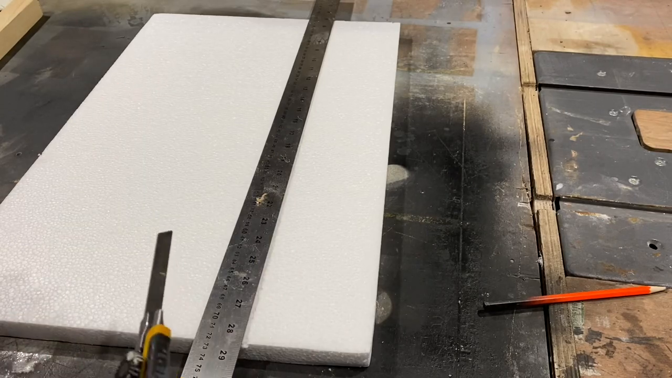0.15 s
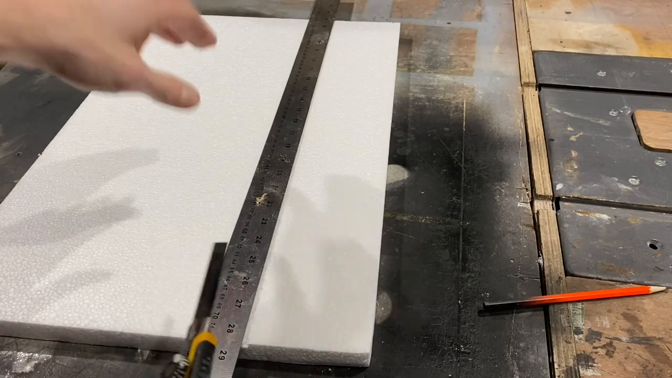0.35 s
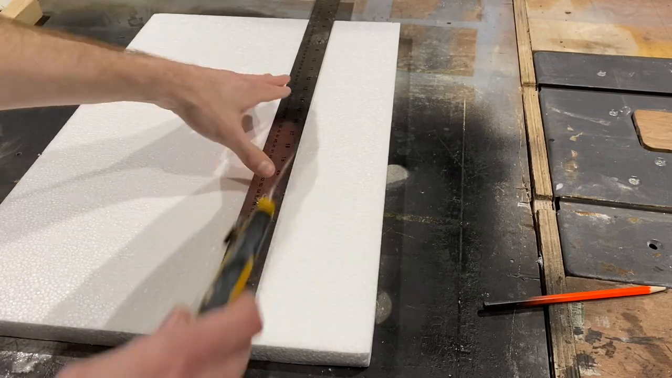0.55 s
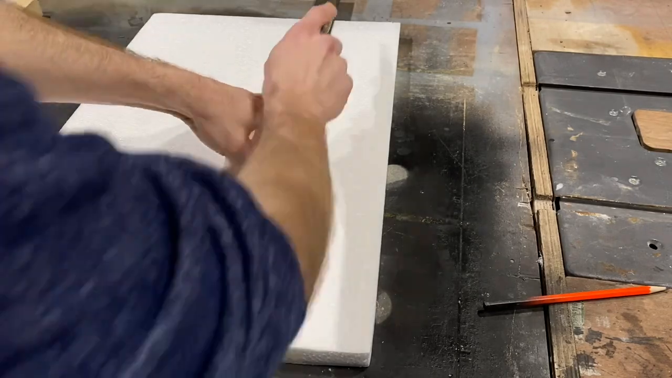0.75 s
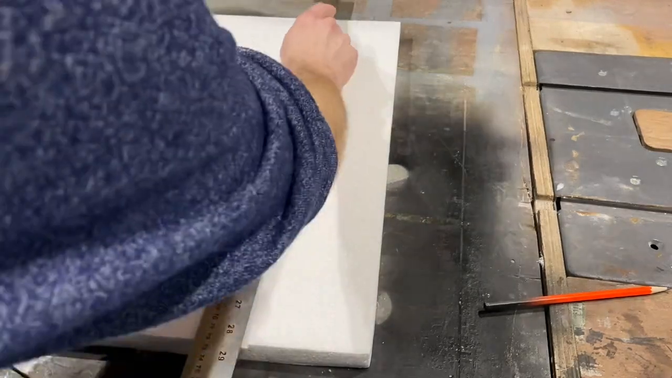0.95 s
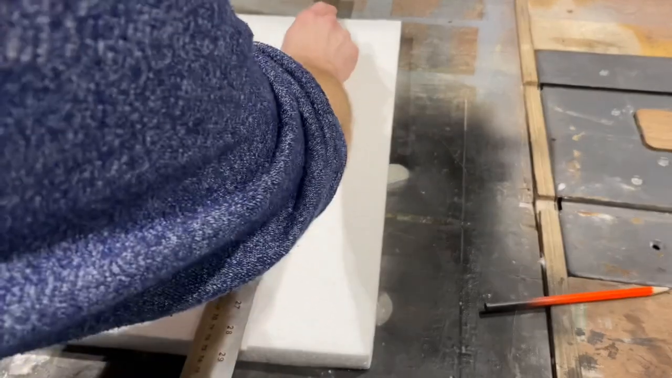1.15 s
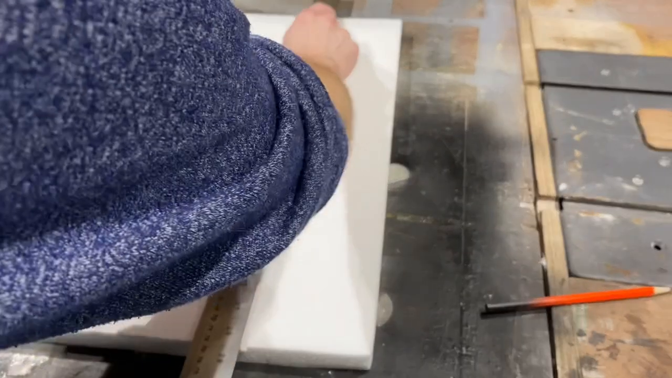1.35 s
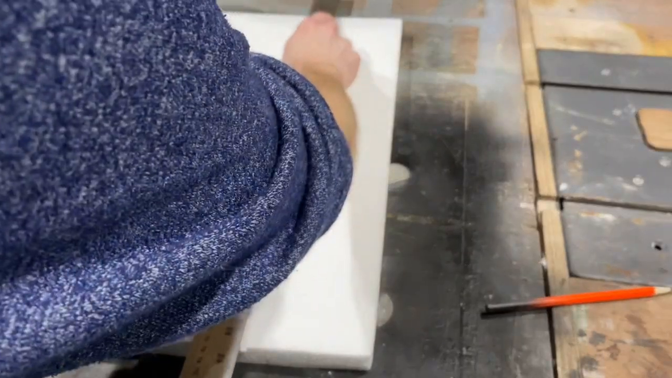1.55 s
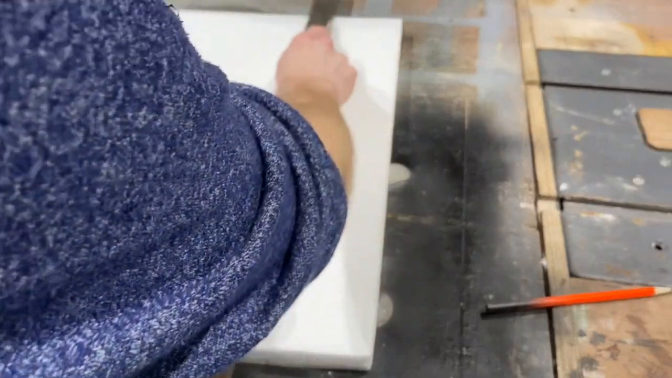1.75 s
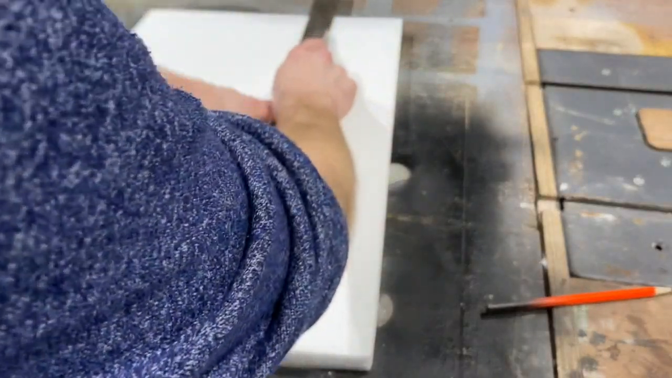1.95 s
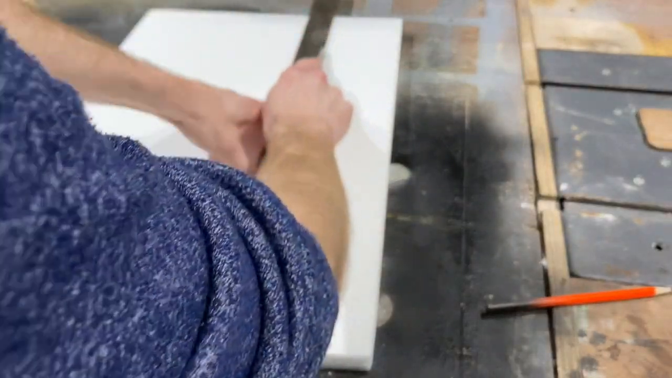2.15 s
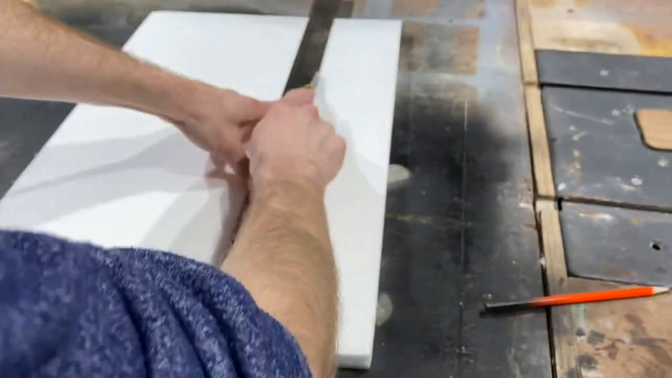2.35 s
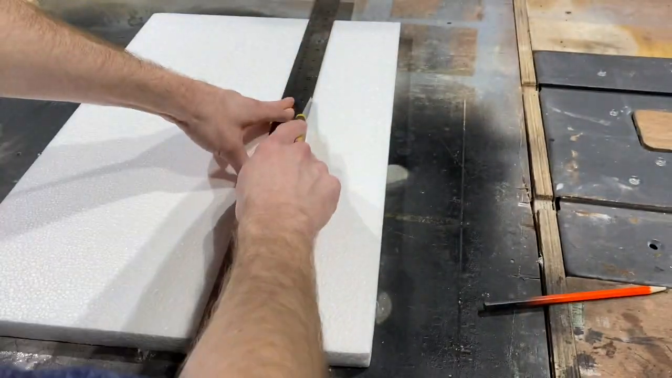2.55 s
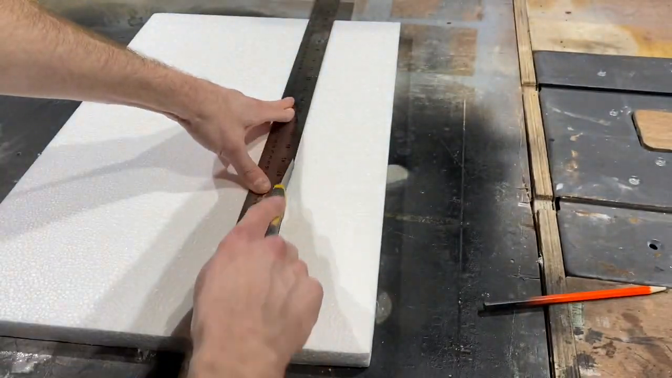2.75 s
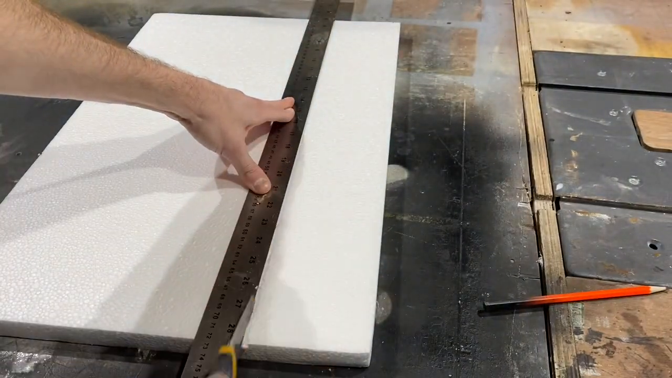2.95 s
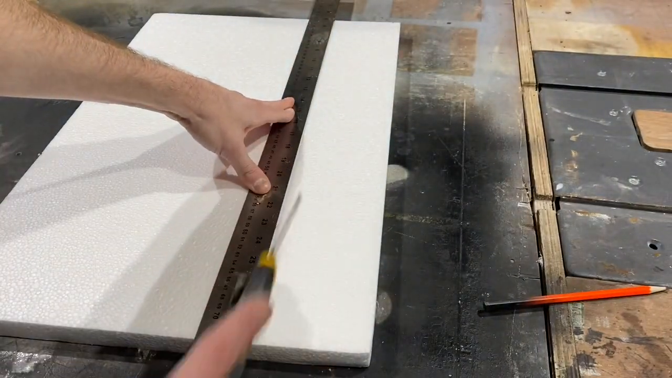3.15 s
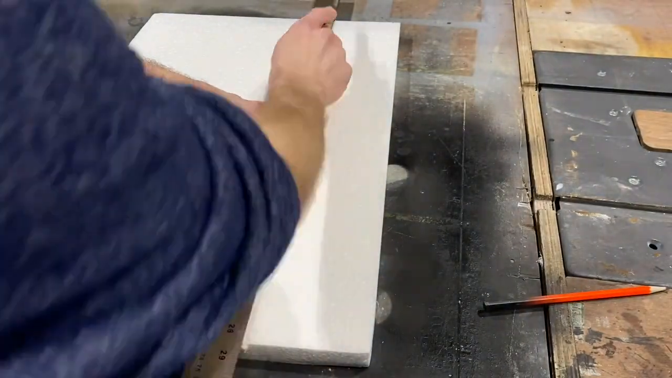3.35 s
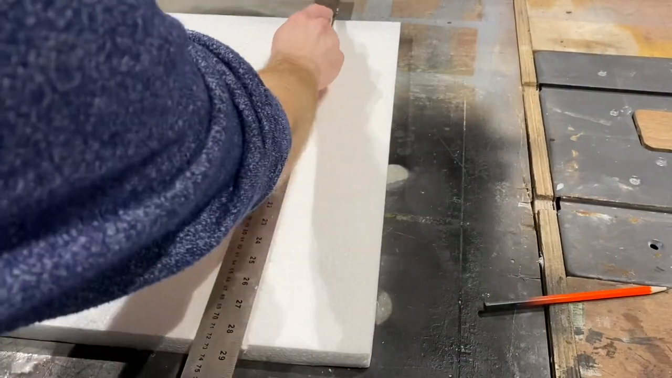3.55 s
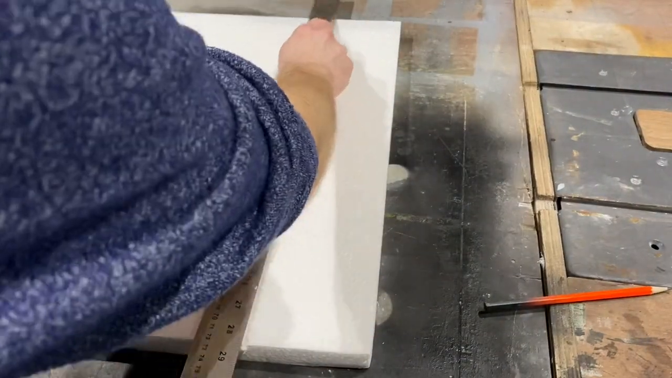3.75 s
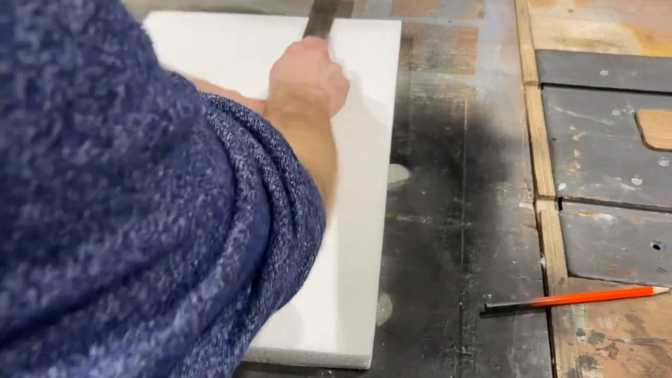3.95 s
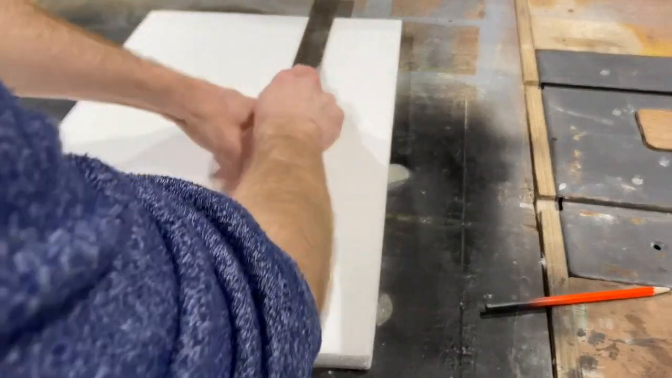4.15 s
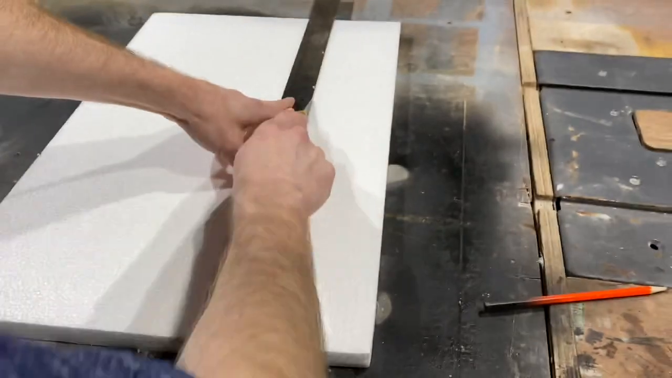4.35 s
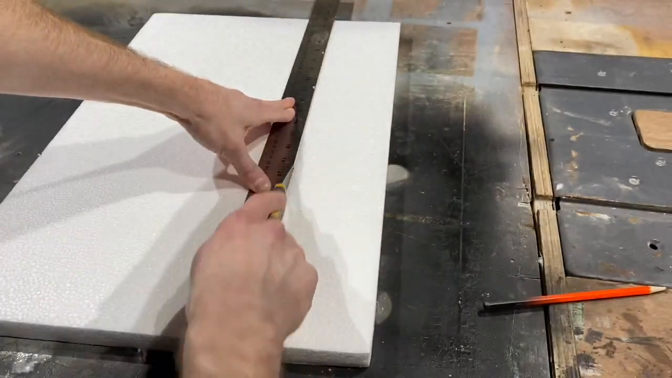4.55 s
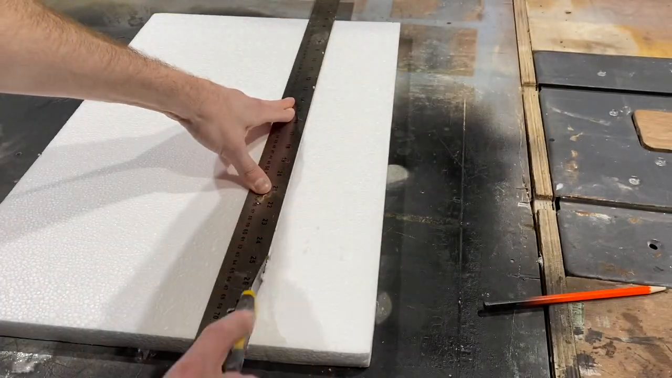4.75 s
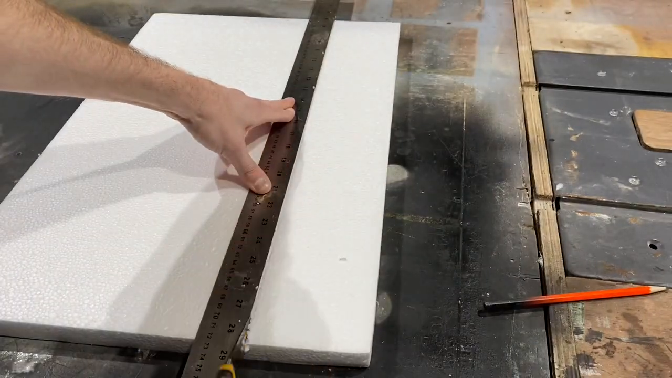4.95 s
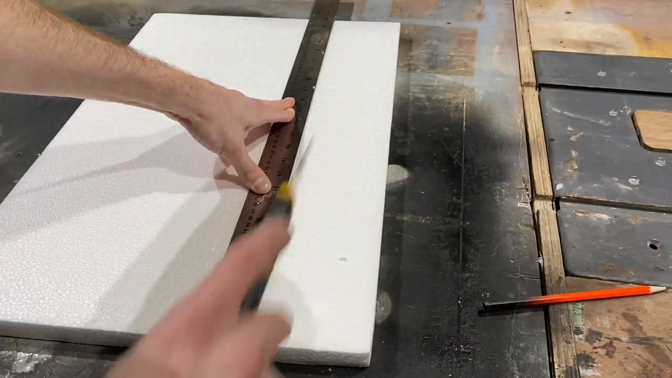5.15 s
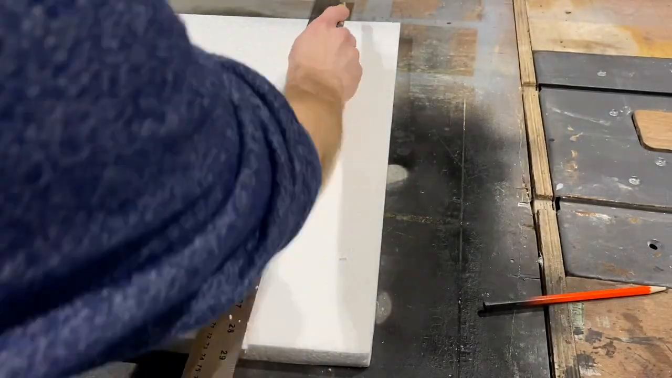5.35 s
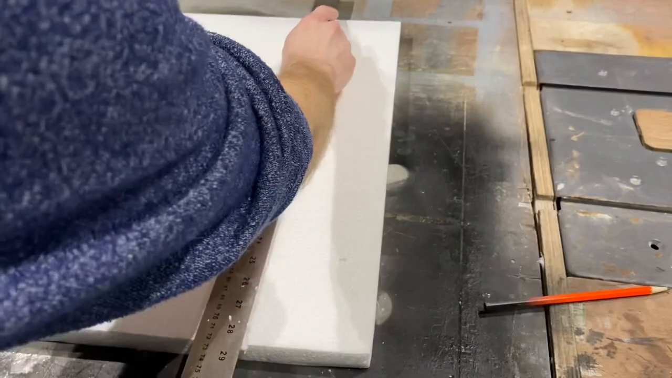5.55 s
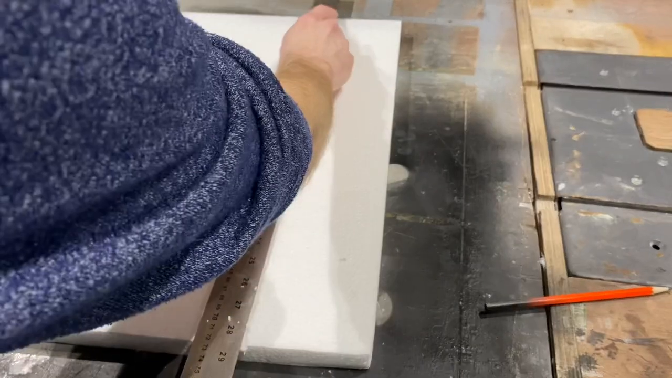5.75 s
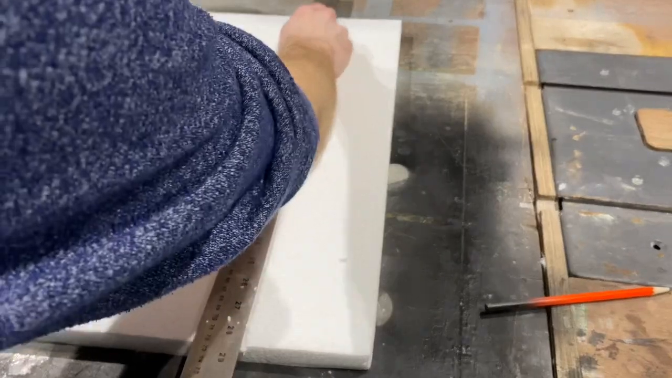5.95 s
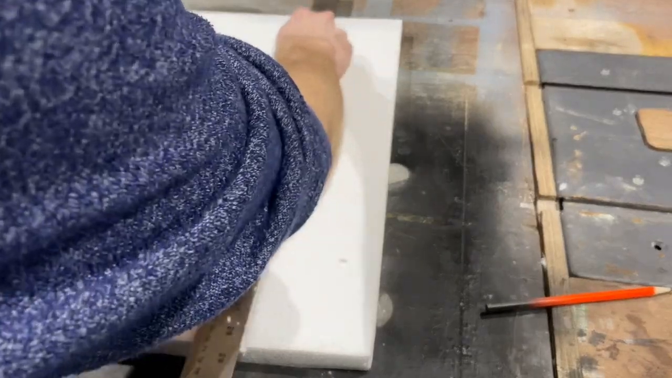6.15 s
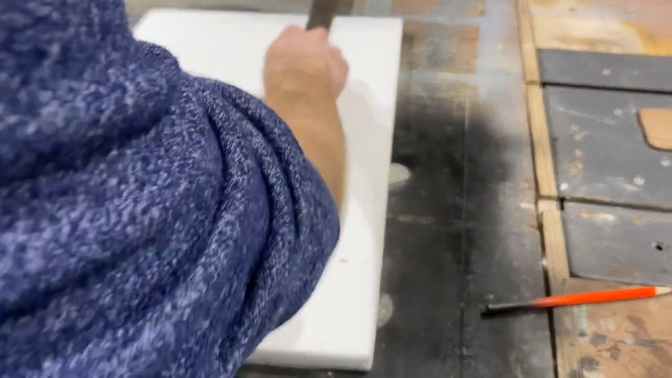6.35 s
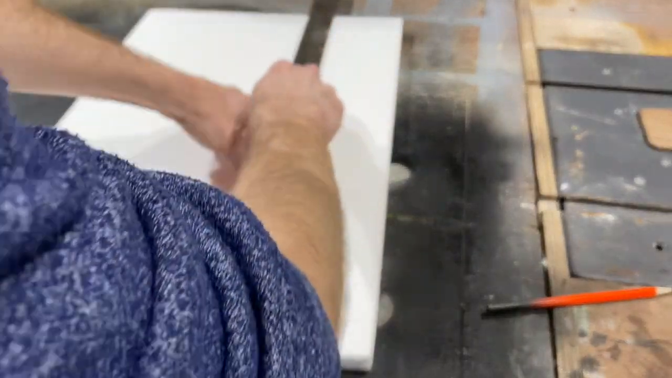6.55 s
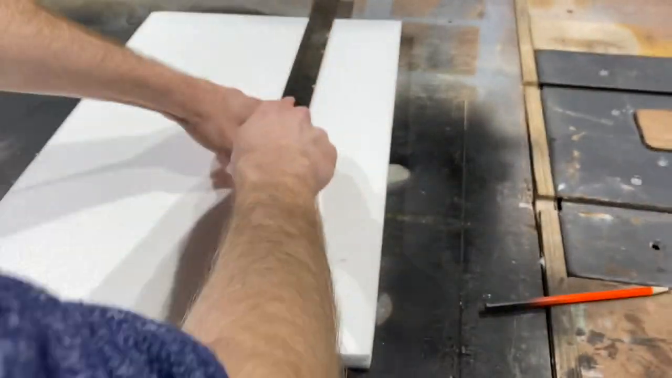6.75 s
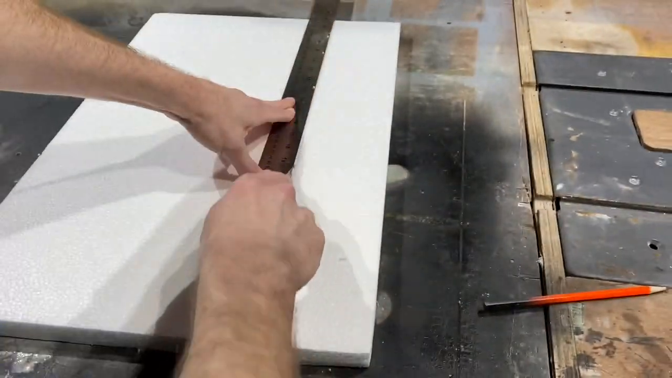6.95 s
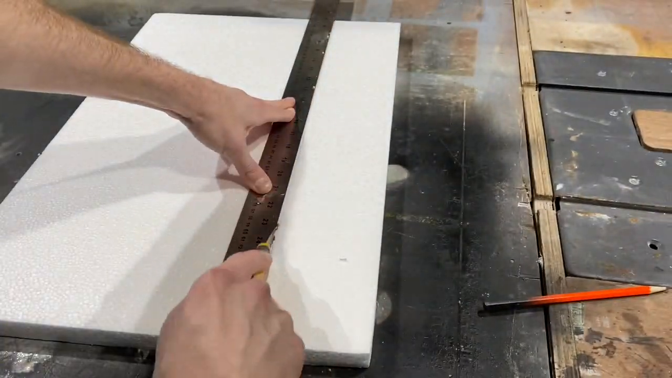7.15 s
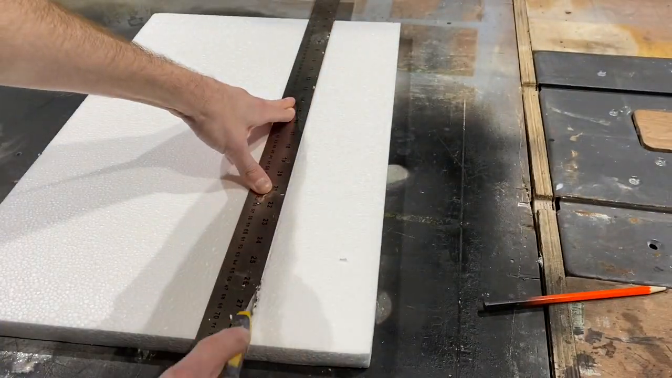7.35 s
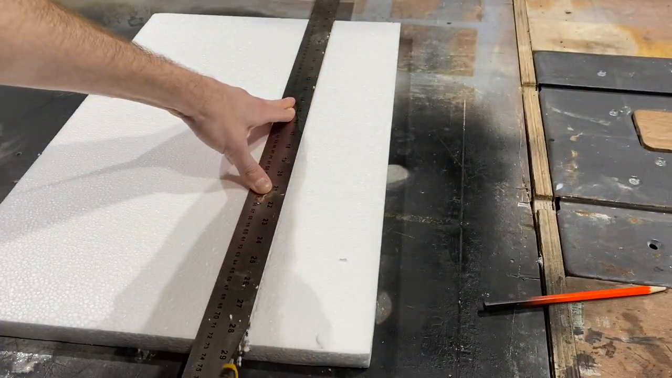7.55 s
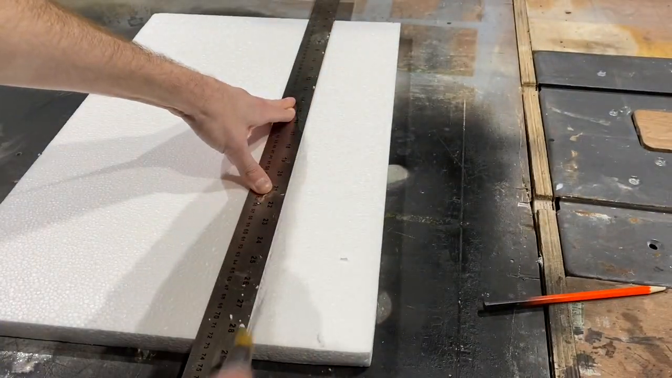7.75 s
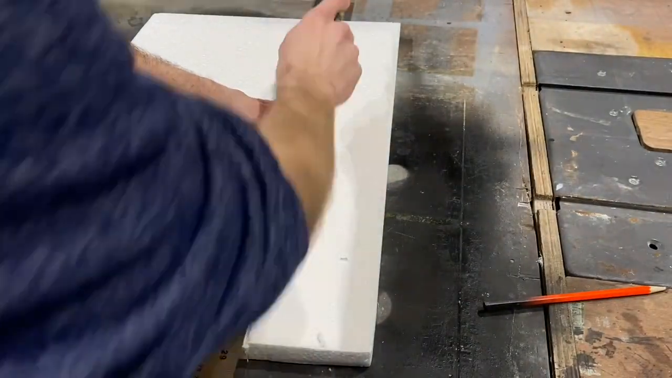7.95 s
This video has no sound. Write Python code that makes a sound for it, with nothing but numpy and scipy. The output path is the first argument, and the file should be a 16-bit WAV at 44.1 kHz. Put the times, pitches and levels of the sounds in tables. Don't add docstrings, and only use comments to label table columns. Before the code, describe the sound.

In a quiet workshop, a wooden knock sounds across the room and a ruler pings faintly. A blade then tears through polystyrene foam three times, each stroke a dense crackling fizz of about a second and a half. Sharp bead snaps and short squeaks sit on top; between strokes come taps, rubs and ticks on the steel ruler. The pressed bench groans softly. Close stereo microphone.

```python
import sys
import numpy as np
from scipy import signal
from scipy.fft import rfft, irfft, next_fast_len
from scipy.io import wavfile
from scipy.ndimage import uniform_filter1d

SR = 44100
rng = np.random.default_rng(int(sys.argv[2]) if len(sys.argv) > 2 else 0)


def gain_from_db(level_db):
    decades = np.asarray(level_db, float) / 20
    return 10 ** decades


def log_audio(samples):
    frames = np.atleast_2d(samples).T
    limited = np.clip(frames, -1, 1)
    pcm = np.round(limited * 32767).astype(np.int16)
    wavfile.write(sys.argv[1], SR, pcm)


N = 352976

# time in seconds, level in dB.
HUM = [(0.0, -60), (0.2, -65.5), (0.6, -57.5), (0.91, -63), (1.54, -58.5), (1.91, -68.5), (2.58, -60.5),
       (2.82, -68.5), (3.05, -75.5), (3.3, -65.5), (3.45, -70.5), (4.9, -70), (5.28, -59), (5.72, -60.5),
       (6.55, -55.5), (8.0, -59)]
# frequency in Hz, gain in dB.
HUM_COLOUR = [(35, -48.5), (60, 3.5), (150, -6), (297, -9.5), (432, -4.5), (815, -13), (1060, -18.5),
              (1430, -21.5), (16500, -75)]
# frequency in Hz, width in Hz, level in dB.
ROOM_MODES = [(135.6, 60, 10), (202, 5.8, 13), (267.3, 56, 9)]
# peak in seconds, level in dB, seconds to rise and seconds to fall 20 dB.
HANDLING = [(.39, -61, 4, 0.026), (8.0, -83, 1.5, 0.87)]
# start in seconds, peak in dB.
KNOCKS = [(0.152, -37), (0.1606, -30.5), (0.186, -47)]
# frequency in Hz, gain in dB.
KNOCK_COLOUR = [(120, -35), (300, -22), (453, -11), (815, -8.5), (1200, -14), (1530, -7.5), (2200, -23),
                (2950, -24.5), (4180, -36), (8000, -54), (10400, -45.5), (17600, -120)]
# peak in seconds, level in dB, seconds to rise and seconds to fall 20 dB.
RUSTLE = [(.04, -77.5, 0.34, 0.084), (.52, -72, 0.04, 0.8), (.68, -69.5, 0.22, 0.23),
          (1.37, -83, 0.41, 0.046), (3.3, -69, 0.13, 0.089), (5.16, -77, 0.13, 0.45),
          (5.85, -76.5, 0.14, 0.028), (7.95, -87, 0.4, 0.55)]
# frequency in Hz, gain in dB.
RUSTLE_COLOUR = [(1470, -53), (2500, -27.5), (4700, -5.5), (6500, -11.5), (8770, -8.5), (15500, -17.5),
                 (16500, -35)]
# peak in seconds, level in dB, seconds to rise and seconds to fall 20 dB.
BENCH = [(2.05, -67.5, 0.14, 9.5), (2.63, -56.5, 0.058, 0.21), (3.256, -67.5, 0.057, 0.057),
         (4.15, -62, 0.19, 0.26), (5.05, -65, 0.093, 0.32), (6.11, -53, 0.032, 0.047), (6.2, -65, .1, 1.6),
         (6.95, -51, 0.97, 0.63), (7.68, -52.5, 0.12, 0.042)]
# frequency in Hz, width in Hz, level in dB.
BENCH_PEAKS = [(205, 8.3, -2), (313.3, 11, 4.5), (432, 9.7, 4.5), (578, 72, 0), (780, 100, -3.5),
               (912, 19, -1)]
# start in seconds, end in seconds, frequency in Hz, level in dB.
GROANS = [(6.08, 6.47, 840, -53), (6.3, 6.672, 204, -56), (6.3, 6.67, 302, -59.5),
          (6.517, 7.187, 603, -57.5), (6.704, 6.88, 586, -50.5), (6.778, 6.893, 200, -57.5),
          (6.822, 7.18, 928, -48.5), (7.1, 7.17, 650, -51.5), (6.08, 6.125, 1500, -54),
          (7.098, 7.725, 445, -60.5), (7.577, 7.717, 760, -57), (6.6, 7.17, 780, -52),
          (6.7, 7.045, 630, -58), (3.6, 3.71, 140, -66), (3.76, 3.85, 203, -61), (5.6, 6.045, 195, -63),
          (4.0, 4.306, 438, -66.5), (5.6, 4.6, 4720, -77)]
# start in seconds, peak in dB, frequency in Hz.
THUMPS = [(0.599, -43, 202), (3.187, -46.5, 112.3), (3.801, -44.5, 149), (5.199, -40.5, 130),
          (5.552, -40.5, 212), (5.59, -48, 205)]
# frequency in Hz, level in dB, 60 dB decay in seconds.
RULER = [(1098, -8, .15), (2067, -9.5, .4), (3359, -12, .13), (5071, -6, .33), (6691, -24, .2),
         (10140, -18, .2)]
# start in seconds, peak in dB.
TAPS = [(1.044, -57), (1.089, -47), (1.104, -49), (1.174, -50), (3.463, -48.5), (3.497, -53), (5.536, -39),
        (5.857, -38.5), (6.088, -33), (7.685, -39)]
# start in seconds, level in dB, tilt in dB per octave, hold in ms.
RUBS = [(.887, -56, -0.5, 49), (1.007, -64.5, -2.5, 7.6), (1.041, -53, -5, 24), (1.297, -61, -3, 41),
        (1.347, -52.5, -4.5, 47), (1.37, -36.5, 4, 9.5), (2.216, -43, 9, 8.4), (2.287, -35, 6, 5.9),
        (3.565, -54, -3, 18), (3.906, -37, -1, 15), (5.338, -51.5, -0.5, 62), (5.787, -65.5, -1, 4.7),
        (5.856, -38, -0.5, 7.8), (7.672, -46, -6, 6.3), (7.725, -65.5, 2, 3)]
# start in seconds, level in dB, tilt in dB per octave, fade in ms.
CLACKS = [(1.09, -58, -3.5, 210), (1.132, -65, -1, 410), (1.167, -50.5, 1, 68), (2.995, -35, -1, 46),
          (3.0035, -53.5, -1.5, 230), (3.461, -53, -1.5, 196), (3.488, -63, -8, 94), (5.509, -58, -0.5, 79),
          (5.537, -48.5, 2, 150), (5.606, -55.5, 0.5, 99), (5.727, -56, 3, 130), (5.832, -54.5, -2.5, 350),
          (5.919, -54, 0, 78)]
SLIDES = [1.167, 1.347, 3.566, 3.906, 5.338, 5.606, 5.833, 7.674]
# frequency in Hz, level in dB, 60 dB decay in seconds.
BLADE = [(1266, -2.5, 0.35), (2173, -9, 0.25), (3540, -11.5, 0.27), (4880, 6, 0.35), (6710, 9.5, 0.33),
         (8800, 10.5, 0.052), (11450, -5, 0.3), (12800, -22, 0.19), (14500, -26.5, 0.17)]
# start in
# seconds, peak in dB.
CHATTER = [(2.9907, -12), (2.9951, -19), (2.997, -19), (2.9985, -16), (3.0024, -20.5), (5.51, -49),
           (5.7271, -40.5)]
# frequency in Hz, level in dB, 60 dB decay in seconds.
CHATTER_MODES = [(4800, -4, .012), (7800, -3, .006), (8500, 0, .014), (11000, -4, .009), (12600, -4, .008),
                 (15000, -5, .007)]
# start in seconds, peak in dB, frequency in Hz, 60 dB decay in seconds.
TINKS = [(1.046, -45, 1480, 0.049), (1.091, -43, 1380, 0.049), (1.103, -53, 3350, .08),
         (1.106, -53, 800, .08), (1.078, -57, 2150, .2), (1.142, -60, 5000, .06), (1.112, -48, 1340, .04),
         (1.052, -49, 2700, .04), (1.14, -54, 3350, .05), (1.142, -61, 6600, 0.25),
         (1.143, -63, 10850, .15), (1.169, -61, 10850, 0.091), (3.008, -53, 1155, 0.15),
         (1.369, -39, 1160, 0.066), (1.369, -33.5, 2920, 0.028), (5.538, -44, 700, 0.07),
         (5.54, -46, 332, 0.069), (3.462, -45.5, 6730, 0.13), (3.464, -50, 8650, 0.033),
         (3.464, -55.5, 4900, 0.064), (3.465, -62, 10850, 0.16), (5.537, -54, 10850, 0.14),
         (5.54, -52, 2100, 0.1), (5.602, -55, 3946, 0.089), (5.729, -58.5, 5020, .08),
         (5.79, -59, 3660, .06), (5.858, -48, 856, .06), (5.858, -41, 1200, 0.066),
         (7.682, -35.5, 1400, 0.047), (7.682, -42, 790, .06), (7.677, -43, 9700, 0.043)]
# start in seconds, level
# in dB, length in ms, start in Hz, end in Hz.
SQUEAKS = [(2.995, -44, 13, 1170, 1184), (3.712, -47, 9.8, 1220, 1190), (3.745, -49.5, 18, 800, 794),
           (3.752, -45, 4, 15000, 15200), (3.776, -35, 13, 9900, 7900), (3.787, -33.5, 13.2, 8000, 10000),
           (3.818, -42.5, 14, 14900, 14400), (3.858, -34, 18, 15100, 14200), (3.876, -40, 24, 11600, 13300),
           (3.904, -44, 8, 11300, 11400), (6.089, -45.5, 30, 1160, 1195), (6.092, -53, 33, 830, 830)]
# start in seconds, peak in dB, tilt in dB per octave.
SNAPS = [(0.3888, -62, -14), (1.0527, -31.5, 1), (1.0906, -43, -2), (1.1295, -42, -2), (1.2172, -57, -0.5),
         (1.26, -54, 2), (1.3025, -50, -2), (1.3684, -14.5, -4.5), (1.528, -31, -1), (1.5699, -21.5, -2),
         (1.6497, -27, -4), (1.768, -26, -4), (1.8149, -24.5, -4), (1.842, -38.5, 0), (1.871, -39, 5),
         (1.9092, -18.5, -5), (1.9402, -33.5, 7), (1.965, -32, -6), (1.9847, -30, 5), (1.996, -29, -4),
         (2.006, -37, -2), (2.3477, -38, 1), (2.883, -27, 6), (2.898, -24, 8), (2.9088, -22, 9),
         (2.925, -27, 10), (2.9906, -27, 8), (2.9975, -27, 3), (3.324, -52, -12), (3.543, -64, 12),
         (3.5804, -32.5, 1), (3.63, -45, 1.5), (3.6433, -37.5, -2), (3.6538, -31, 1), (3.6597, -27, -2),
         (3.665, -29, -1), (3.917, -26, 2), (4.439, -27, 20.5), (4.4713, -30, 2), (4.6412, -26, 12),
         (4.777, -25.5, 11), (5.534, -32.5, 7), (5.8572, -26.5, -3.5), (5.9174, -45, 0), (6.111, -32, 0),
         (6.118, -30, -2), (6.5121, -31, 12), (6.9496, -24.5, 10), (7.2504, -23.5, 5.5)]
# frequency in Hz, gain in dB.
SNAP_COLOUR = [(350, -71), (600, -31), (1300, -15), (2240, -19), (4610, 1.5), (5440, -7.5), (8250, -9),
               (10600, -16), (13800, -12.5), (16500, -36.5)]
# time in seconds, drag in dB, slot resonance in Hz, uncovered fizz in dB.
STROKES = [
    [(1.4, -51, 4670, -12.5), (1.6, -45, 4400, -15), (2.097, -43.5, 5230, -10), (2.237, -44.5, 5320, -1),
     (2.43, -51.5, 5640, -1), (2.52, -51.5, 7030, 1), (2.76, -48.5, 6600, 0), (2.855, -42.5, 5750, 0.5),
     (2.988, -45, 4580, 1.5)],
    [(3.59, -60.5, 4870, -7), (3.68, -45.5, 4560, -3), (3.9, -38, 4360, -7), (4.076, -40.5, 5330, -10),
     (4.24, -47.5, 5400, 4.5), (4.33, -50, 6930, 1.5), (4.55, -48, 6500, 1.5), (4.724, -44, 5380, -0.5),
     (5.03, -53, 5070, -3.5)],
    [(5.89, -59, 5620, -3), (5.973, -48.5, 4840, -3), (6.159, -43, 4480, -11), (6.319, -40, 5270, -13),
     (6.529, -46.5, 5540, -1.5), (7.2, -45, 5380, -2), (7.469, -53, 5250, -0.5), (7.609, -47.5, 5100, -7),
     (7.67, -56.5, 5590, -4)],
]
GRIT = [0.8, 0.45, 0.45]
# level at start and at end in dB re drag, resonance in Hz on the far part
# and on the near part, hand-over between them in seconds.
BOARDS = [(-11, -10.5, 1327, 1980, 2.68), (-12.5, -16, 1395, 1920, 4.4), (-10, -3, 850, 930, 12)]
# frequency in Hz, gain in dB.
TEAR_COLOUR = [(700, -67.5), (2200, -11.5), (3000, -3.5), (4000, -1.5), (6000, -1), (8000, -5), (11000, -6),
               (16500, -31)]
# frequency in Hz, gain in dB.
FIZZ_COLOUR = [(5000, -20.5), (7000, 0), (8500, -1.5), (10500, -1.5), (12500, 1.5), (15000, 5.5),
               (16500, -14)]
# frequency in Hz, gain in dB.
BOARD_COLOUR = [(350, -35.5), (700, -10.5), (1200, -2), (1800, 0.5), (2400, -4.5), (3200, -14)]
# frequency in Hz, half width in Hz, level in dB.
EDGE = [(3050, 250, 0), (3850, 250, 0)]
# start in seconds,
# end in seconds, start in Hz, end in Hz, gain in dB.
ARCS = [(1.5, 1.8, 6500, 6300, 3), (1.543, 2.14, 3220, 3250, 5), (2.15, 2.45, 3220, 2930, -27),
        (2.24, 2.5, 5500, 5800, -9), (2.302, 2.7, 3960, 3450, 2.5), (2.65, 2.99, 1950, 2000, 3),
        (2.602, 2.98, 3970, 3920, 2), (2.75, 2.98, 3100, 3200, 5.5), (2.298, 2.5, 4450, 4400, -8),
        (2.76, 2.98, 8800, 7800, 6), (4.3, 4.75, 10300, 8300, 5), (6.223, 6.483, 5750, 5430, 5.5),
        (3.95, 4.3, 5700, 6000, 2), (4.202, 4.45, 3540, 3700, 5), (4.5, 5.002, 4000, 4000, 5.5),
        (4.58, 4.88, 5860, 5800, 8.5), (5.9, 6.26, 3800, 3750, 5), (6.148, 6.424, 2800, 3020, 13),
        (6.26, 6.49, 1700, 1760, 7), (7.15, 7.65, 2630, 2470, 9), (6.5, 6.855, 7100, 7200, 4),
        (6.5, 7.196, 3970, 3530, 7), (6.553, 7.19, 3350, 2650, 12), (6.69, 7.1, 5400, 5500, -4.5),
        (6.75, 7.052, 4700, 4700, 6), (6.94, 7.402, 7400, 6400, 6.5), (7.2, 7.65, 3960, 3700, 3),
        (7.46, 7.665, 12700, 12500, 9), (7.45, 7.67, 14300, 14300, 0)]
# frequency in Hz, likeness from 0 to 1.
SAME = [(60, 0.93), (150, 0.96), (380, 0.93), (950, 0.44), (2380, 0.46), (5980, 0.88), (15000, 0.88)]
# frequency in Hz, lead in radians.
LEAD = [(0, 0.062), (1120, -0.046), (12800, 0.83), (15700, -0.7), (16500, -0.9)]
# frequency in Hz, left over right in dB.
LEFT = [(60, 0.48), (180, 0.11), (550, 1.3), (1650, 1.1), (4970, 0.73), (15000, 1.7)]
# time in seconds, left over right in dB.
KNIFE_PAN = [(0.71, 2), (1.16, 1.5), (2.54, 2), (3.16, 4), (3.43, 1.5), (5.44, 2.5), (6.08, 2)]


def evened(x):
    return x / np.sqrt(np.mean(x ** 2) + 1e-20)


def lumpy(noise, width, *axis):
    return evened(uniform_filter1d(noise, width, *axis))


def read(points, hz):
    f, value = np.transpose(points)
    return np.interp(np.log(hz + 1), np.log(f + 1), value)


def bell(hz, centre, half_width):
    return 1 / (1 + ((hz - centre) / half_width) ** 2)


def resonances(rows, hz):
    return sum(gain_from_db(db) * bell(hz, f, width / 2) for f, width, db in rows)


def tone(hz, t):
    return np.sin(2 * np.pi * hz * t)


def follow(tables, t, column, outside=None):
    out = np.full(len(t), np.nan)
    for rows in tables:
        rows = np.array(rows)
        inside = (t >= rows[0, 0]) & (t <= rows[-1, 0])
        out[inside] = np.interp(t[inside], rows[:, 0], rows[:, column])
    if outside is None:
        every = np.concatenate(tables)
        outside = np.interp(t, every[:, 0], every[:, column])
    return np.where(np.isnan(out), outside, out)


def swells(rows, t, steeper=1, order=1):
    total = 0
    for s, db, rise_s, fall_s in rows:
        away = np.maximum((s - t) / rise_s, (t - s) / fall_s)
        total = total + gain_from_db(db - 20 * steeper * away ** order)
    return total


def add(mix, s, sound):
    part = mix[round(s * SR):][:len(sound)]
    part += sound[:len(part)]


def colour(x, gain):
    size = next_fast_len(len(x))
    return evened(irfft(rfft(x, size) * gain(np.fft.rfftfreq(size, 1 / SR)), size)[:len(x)])


def struck(noise, envelope, gain):
    burst = colour(np.pad(noise * envelope, (SR // 1000, 0)), gain)
    return burst / abs(burst).max()


def hum():
    t = np.arange(N) / SR

    def air_gain(hz):
        return gain_from_db(read(HUM_COLOUR, hz)) * (1 + resonances(ROOM_MODES, hz)) / (1 + (100 / (hz + 1)) ** 4)

    air = colour(rng.standard_normal(N), air_gain)
    rumble = colour(rng.standard_normal(N), lambda hz: 1 / (1 + (hz / 70) ** 4) / (1 + (50 / (hz + 1)) ** 6))
    lumps = lumpy(uniform_filter1d(rng.standard_normal(N), 3000), 3000)
    still_rumble_db = -101
    return air * gain_from_db(follow([HUM], t, 1) + 1.3 * lumps) + rumble * (gain_from_db(still_rumble_db) + swells(HANDLING, t))


def knock():
    out, t = np.zeros(N), np.arange(SR // 2) / SR
    blow = np.arange(len(t)) == SR // 250
    tail = gain_from_db(-29.0 - 60 * t / 0.3) * np.clip((t - 1 / 250) / 0.0073, 0, 1)
    for s, db in KNOCKS:
        hit = blow + tail * rng.standard_normal(len(t))
        add(out, s, gain_from_db(db + 11.5) * struck(hit, 1, lambda hz: gain_from_db(read(KNOCK_COLOUR, hz))))
    return out


def rustle():
    t, noise = np.arange(N) / SR, rng.standard_normal((2, N))
    dull = colour(noise[0], lambda hz: 1 / (1 + (700 / (hz + 1)) ** 4) / (1 + (hz / 2500) ** 2))
    bright = colour(noise[1], lambda hz: gain_from_db(read(RUSTLE_COLOUR, hz)))
    still_dull_db, still_bright_db = -87, -93
    dull_level = gain_from_db(still_dull_db) + swells(RUSTLE, t, order=2)
    bright_level = gain_from_db(still_bright_db) + swells(RUSTLE, t, steeper=1.3, order=2)
    return dull * dull_level + bright * bright_level


def bench():
    def top_gain(hz):
        return gain_from_db(-4.0) * (hz > 150) / (1 + (hz / 1200) ** 4) + resonances(BENCH_PEAKS, hz)

    lumps = lumpy(uniform_filter1d(rng.standard_normal(N), 2000), 2000)
    return colour(rng.standard_normal(N), top_gain) * swells(BENCH, np.arange(N) / SR) * gain_from_db(2.0 * lumps)


def groans():
    out = np.zeros(N)
    width_share, rough_db = .085, 1.8
    for start, end, f, db in GROANS:
        noise = rng.standard_normal(SR)
        mode = colour(noise, lambda hz: bell(hz, f, width_share * f / 2))
        mode = mode * gain_from_db(rough_db * lumpy(noise[::-1], SR // 50))
        mode = mode[:round((end - start) * SR)]
        add(out, start, gain_from_db(db) * mode * signal.windows.tukey(len(mode), .4))
    return out


def pings():
    out, t = np.zeros(N), np.arange(SR // 2) / SR
    ping_s, ping_db = .496, -48
    add(out, ping_s, sum(gain_from_db(ping_db + db - 60 * t / t60) * tone(hz, t) for hz, db, t60 in RULER))
    for s, db, hz in THUMPS:
        add(out, s, gain_from_db(db - 60 * t / 0.091) * np.minimum(t / 0.0093, 1) * tone(hz, t))
    return out


def ring(x, spread_db, damping=.3):
    t = np.arange(SR // 8) / SR
    modes = np.zeros(len(t))
    for (hz, db, t60), extra_db in zip(BLADE, spread_db):
        modes += gain_from_db(db + extra_db - 60 * t / min(damping * t60, 1 / 16)) * tone(hz, t)
    return signal.fftconvolve(x, modes / np.linalg.norm(modes))[:len(x)]


def tinks():
    out, t = np.zeros(N), np.arange(SR // 4) / SR
    highpass = signal.butter(4, 3200, "high", fs=SR, output="sos")
    for s, db in CHATTER:
        blow = np.zeros(len(t))
        for hz, mode_db, t60 in CHATTER_MODES:
            chance = rng.standard_normal()
            blow += gain_from_db(mode_db + 2.6 * chance - 60 * t / t60) * tone(hz * (1 + 0.019 * chance), t)
        blow = signal.sosfilt(highpass, blow)
        add(out, s, gain_from_db(db) * blow / abs(blow).max())
    for s, db, hz, t60 in TINKS:
        add(out, s, gain_from_db(db - 60 * t / t60) * np.minimum(t / .0015, 1) * tone(hz, t))
    return out


def scuffs():
    out, t = np.zeros(N), np.arange(SR // 4) / SR
    rub_fade_ms, rub_ring_db = 120, -18.5
    clack_hold_share, clack_ring_db = 0.065, -14
    slide_rise_s, touch_rise_s = 0.0077, 0.004
    touches = [(*row, rub_fade_ms, rub_ring_db) for row in RUBS]
    touches += [(*row[:3], clack_hold_share * row[3], row[3], clack_ring_db) for row in CLACKS]
    for s, db, tilt_db, hold_ms, fade_ms, ring_db in touches:
        noise, grit = rng.standard_normal((2, len(t)))
        hold = gain_from_db(-60 * np.maximum(1000 * t - hold_ms, 0) / max(fade_ms, 5))
        tick = gain_from_db(7 - 60 * t / 0.021)
        slides = min(abs(s - np.array(SLIDES))) < 1 / 200
        shape = (hold + tick) * np.minimum(t / (slide_rise_s if slides else touch_rise_s), 1)
        drive = evened(noise * gain_from_db(3.5 * lumpy(grit, 140)))

        def rub_gain(hz):
            bumps_db = 3.5 * np.interp(hz, np.arange(32) * 700, grit[:32])
            lowcut = 1 + (1400 * gain_from_db(0.55 * tilt_db) / (hz + 1)) ** 4
            return gain_from_db(tilt_db * np.log2((hz + 50) / 4000) + bumps_db) / lowcut

        rub = shape * colour(drive, rub_gain)
        shake = ring(shape * drive, 3 * np.clip(grit[:len(BLADE)], -2, 0))
        add(out, s, gain_from_db(db) * (rub + gain_from_db(ring_db) * shake))
    for s, db in TAPS:
        tap = struck(rng.standard_normal(len(t)), gain_from_db(-60 * t / 0.052), lambda hz: gain_from_db(read(BOARD_COLOUR, 1.31 * hz)))
        add(out, s, gain_from_db(db + 3.0) * tap)
    return out


def squeaks():
    out = np.zeros(N)
    for s, db, length_ms, start_hz, end_hz in SQUEAKS:
        u = np.linspace(0, 1, round(length_ms * SR / 1000))
        grip = rng.standard_normal(2000)
        wobble = 1 + 0.14 * start_hz / 10000 * uniform_filter1d(grip, 30)[:len(u)]
        ragged_db = 1.3 * lumpy(grip[::-1], 90)[:len(u)]
        turns = np.cumsum((start_hz + (end_hz - start_hz) * u) * wobble) / SR
        add(out, s, gain_from_db(db + 5.5 + ragged_db) * tone(1, turns) * signal.windows.tukey(len(u), .3))
    return out


def snaps():
    out, t = np.zeros(N), np.arange(SR // 16) / SR
    crack_db, tail_db = 13, -18
    envelope = gain_from_db(-60 * t / 0.0042) + gain_from_db(tail_db - 60 * t / 0.18)
    for s, db, tilt_db in SNAPS:
        def gain(hz):
            tilted_db = read(SNAP_COLOUR, hz) + tilt_db * np.log2((hz + 50) / 4000)
            return gain_from_db(tilted_db) / (1 + (800 / (hz + 1)) ** 6)

        burst = rng.standard_normal(len(t)) + gain_from_db(crack_db) * (t == 0)
        add(out, s, gain_from_db(db + 5.5) * struck(burst, envelope, gain))
    return out


def arcs(f, t):
    out = np.zeros((len(f), len(t)))
    for start, end, start_hz, end_hz, db in ARCS:
        u = np.clip((t - start) / (end - start), 0, 1)
        hz = start_hz + (end_hz - start_hz) * u
        out += db * np.sqrt(abs(np.sin(np.pi * u))) * bell(f, hz, 0.041 * hz)
    return out


def band_unit(gain, hz, lo, hi):
    return gain / np.sqrt((gain[(hz > lo) & (hz < hi)] ** 2).sum(0) / len(hz))


def bead_crackle():
    biggest_bead = 4
    size = gain_from_db(5.5 * np.minimum(rng.exponential(1, N), biggest_bead))
    beads = size * (rng.random(N) < 5000 / SR) * rng.choice([-1., 1.], N)
    grit = follow([[(c[0][0], g), (c[-1][0], g)] for c, g in zip(STROKES, GRIT)], np.arange(N) / SR, 1)
    crackle = evened(grit * evened(beads) + rng.standard_normal(N))
    return evened(crackle + gain_from_db(-26.0) * ring(crackle, np.zeros(len(BLADE))))


def board_curves(t):
    levels, pitches = [], []
    half_s = 0.024 / 2
    for cut, (start_db, end_db, far_hz, near_hz, hand_over) in zip(STROKES, BOARDS):
        start, end = cut[0][0], cut[-1][0]
        levels.append([(start, start_db), (end, end_db)])
        pitches.append([(start, far_hz), (hand_over - half_s, far_hz), (hand_over + half_s, near_hz), (end, near_hz)])
    return follow(levels, t, 1), follow(pitches, t, 1)


def strokes():
    size, hop = 512, 128
    hz, t, z = signal.stft(bead_crackle(), SR, nperseg=size, noverlap=size - hop)
    f = hz[:, None]
    level_db, slot_hz, fizz_db = (follow(STROKES, t, k) for k in range(1, 4))
    board_db, board_hz = board_curves(t)

    slot_db = 7 + .3 * (level_db + 45) + 2.5 * (slot_hz / 1000 - 5)
    width_hz = 560 * (5000 / slot_hz) ** 2.2
    slot = 1 + gain_from_db(np.minimum(slot_db, 12)) * bell(f, slot_hz, width_hz)
    slot = slot + sum(gain_from_db(db) * bell(f, edge_hz, w) for edge_hz, w, db in EDGE)
    hollow_db = -1.5 * np.maximum(slot_hz / 1000 - 4.5, 0)
    slot = slot * gain_from_db(hollow_db * bell(f, .8 * slot_hz, 500))
    overtone = 1 + gain_from_db(slot_db - 6) * bell(f, 3100 + 1.103 * slot_hz, 400)
    board = 1 + gain_from_db(5.0 + (board_hz - 900) / 400) * bell(f, board_hz, 110)

    tear_part = band_unit(gain_from_db(read(TEAR_COLOUR, f)) * slot, hz, 2600, 9300)
    fizz_part = gain_from_db(fizz_db) * band_unit(gain_from_db(read(FIZZ_COLOUR, f)) * overtone, hz, 7500, 16000)
    board_part = gain_from_db(board_db) * band_unit(gain_from_db(read(BOARD_COLOUR, f)) * board, hz, 800, 2600)
    gain = np.sqrt(tear_part ** 2 + fizz_part ** 2 + board_part ** 2)

    patches = lumpy(uniform_filter1d(rng.standard_normal(z.shape), 6, 0), 30, 1)
    jerks = lumpy(rng.standard_normal(len(t)), 8) * np.clip(f / 9000, .2, 1.5)
    cutting = uniform_filter1d(follow(STROKES, t, 0, 0.) > 0, 5, output=float)
    z = z * gain * gain_from_db(level_db + arcs(f, t) + 2.07 * patches + 0.76 * jerks) * cutting
    return signal.istft(z, SR, nperseg=size, noverlap=size - hop)[1][:N]


def ports(x):
    t = np.arange(SR // 4) / SR
    fade = gain_from_db(-60 * t / .02) + gain_from_db(-12.0 - 60 * t / 0.16)
    echoes = rng.choice([-1., 1.], (3, 2, len(t))) * (rng.random((3, 2, len(t))) < .1) * fade * (t > .001)
    echoes = echoes / np.linalg.norm(echoes, axis=2, keepdims=True)
    size = next_fast_len(N + len(t))
    hz = np.fft.rfftfreq(size, 1 / SR)
    drift = np.sqrt(2 / 3) * np.cos(2 * np.pi * (1.3 * np.arange(N) / SR + np.arange(3)[:, None] / 3))
    thrown = rfft(drift * x, size)[:, None] * rfft(echoes, size)
    same, side = np.clip(read(SAME, hz), 0, 1), np.array([[.5], [-.5]])
    heard = np.sqrt(same) * rfft(x, size) + np.sqrt(1 - same) * thrown.sum(0)
    heard = heard * np.exp(1j * side * read(LEAD, hz)) * gain_from_db(side * read(LEFT, hz))
    return irfft(heard, size)[:, :N]


def scene():
    room = ports(hum() + knock() + rustle() + bench() + groans() + pings())
    knife = ports(tinks()) + ports(scuffs() + squeaks() + snaps() + strokes())
    pan_db = follow([KNIFE_PAN], np.arange(N) / SR, 1) - 1.5
    return room + knife * gain_from_db(np.array([[.5], [-.5]]) * pan_db)


def band_limit(x):
    return signal.sosfilt(signal.butter(12, 16990, fs=SR, output="sos"), x)


def record(dry):
    dry = signal.sosfilt(signal.butter(2, 45, "high", fs=SR, output="sos"), dry)
    limited = .45 * np.tanh(dry / .45)
    edge = signal.firwin(511, 15800, window=("kaiser", 6), fs=SR)
    mix = signal.oaconvolve(limited, edge[None], "same") + gain_from_db(-33.5) * limited
    return band_limit(mix)


dry = scene()
out = record(dry)
log_audio(out)
```